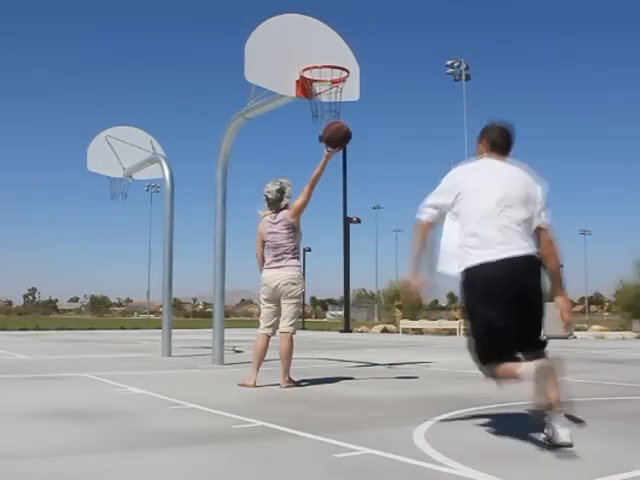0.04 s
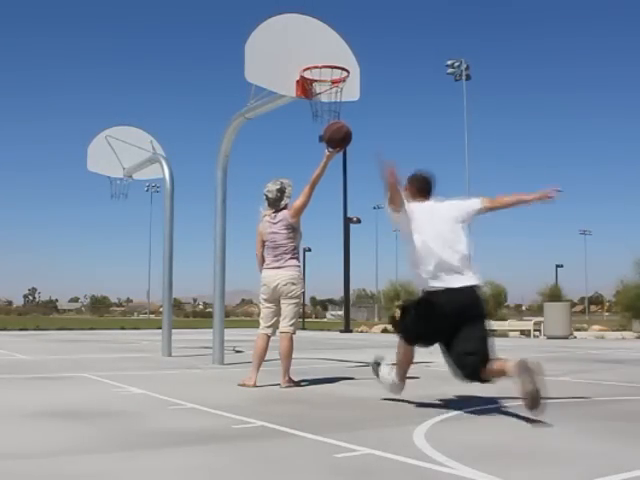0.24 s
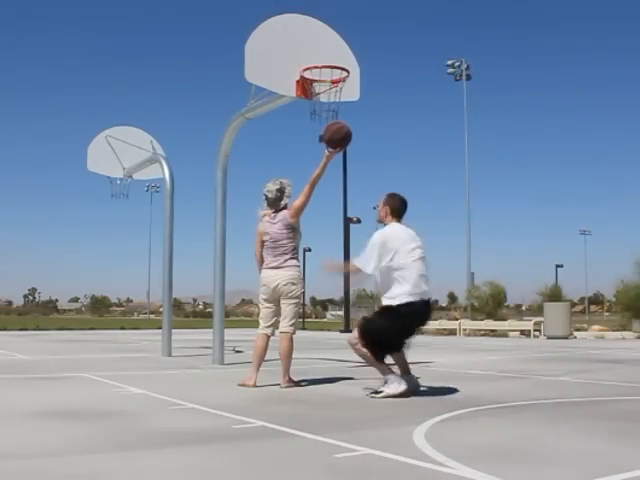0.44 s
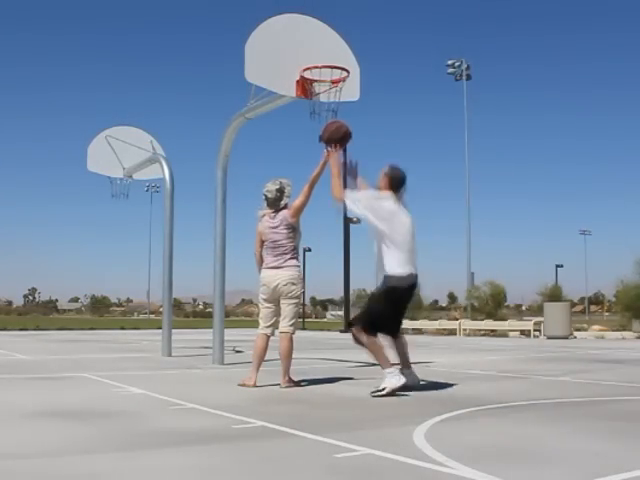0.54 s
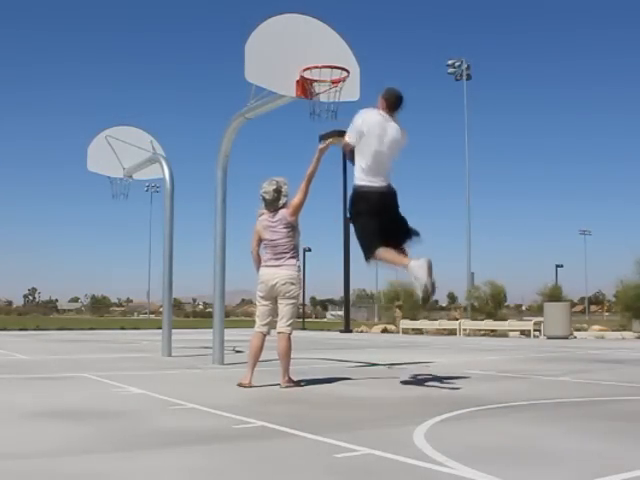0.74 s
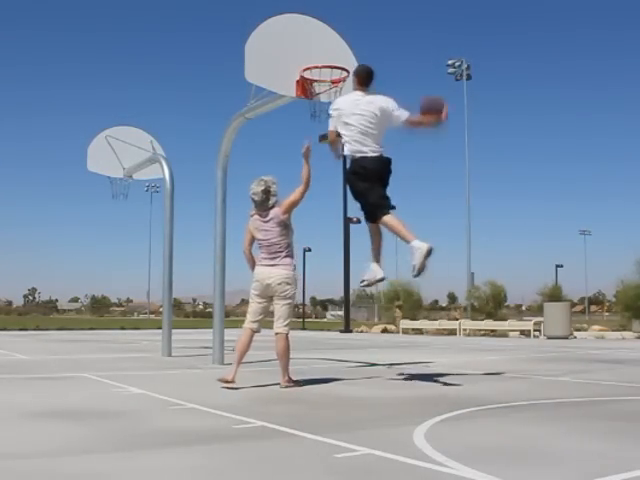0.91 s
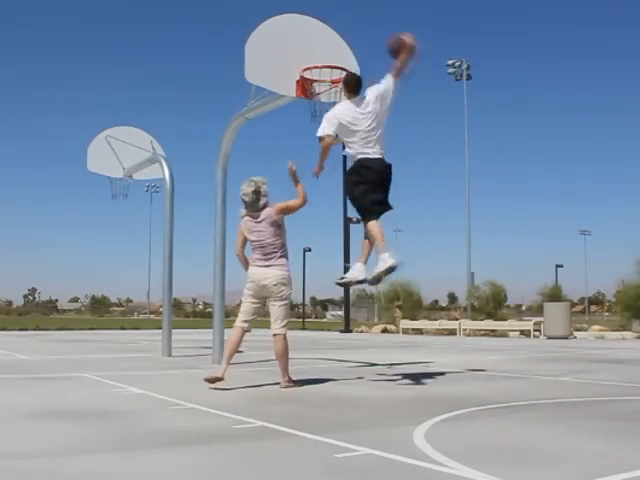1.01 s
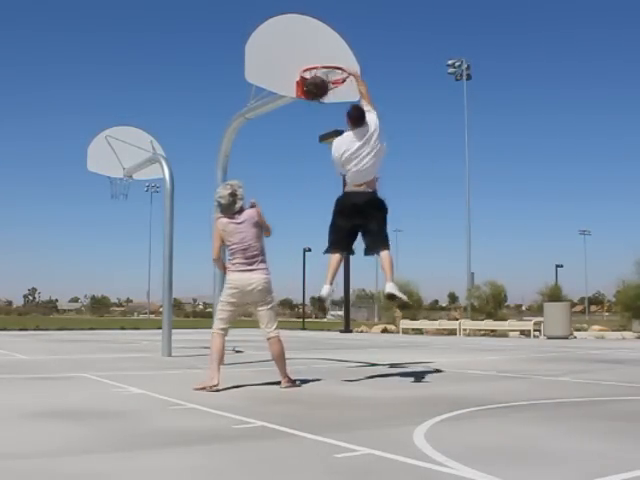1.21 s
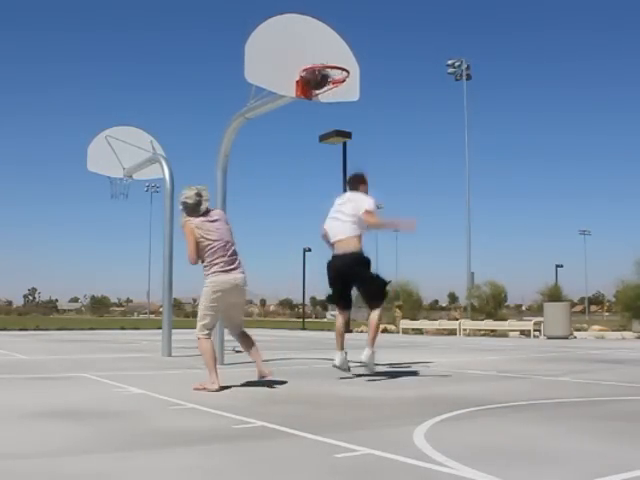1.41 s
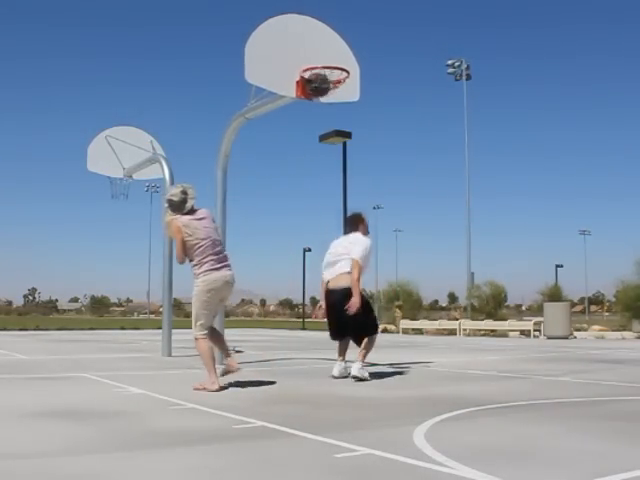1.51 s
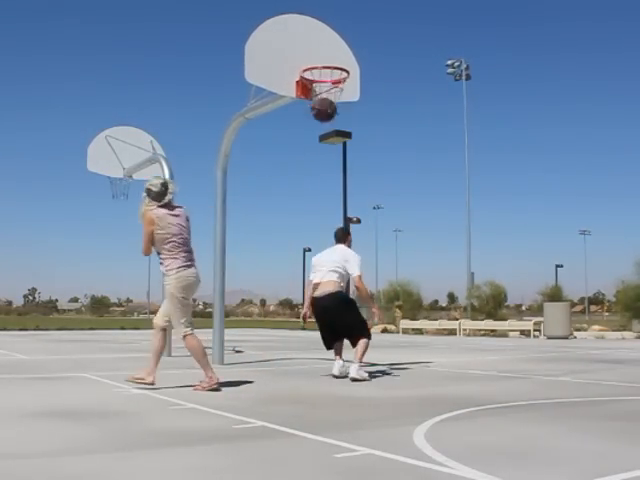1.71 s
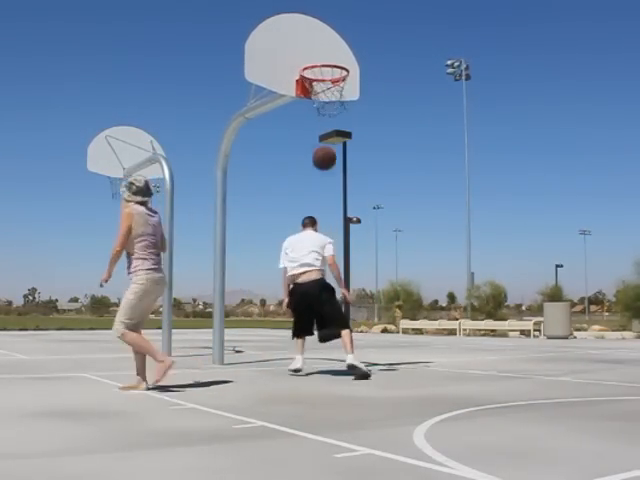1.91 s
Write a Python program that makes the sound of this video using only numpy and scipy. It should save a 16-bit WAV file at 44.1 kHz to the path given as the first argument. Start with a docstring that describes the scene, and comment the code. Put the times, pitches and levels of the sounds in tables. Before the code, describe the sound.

A basketball dunk hits the rim and jangles a chain net, with wind on the microphone.

```python
"""A player runs up on an outdoor concrete court, his shoes tapping, scraping and squeaking.
He slaps a held-up ball and dunks it: the ball knocks the steel rim, the backboard clatters
and the chain net snaps taut. Its links hit each other and jangle on, slowly getting quieter.
All along, gusts buffet the microphone over a faint rush of open air."""
import sys
import numpy as np
from scipy import signal
from scipy.fft import rfft, irfft
from scipy.io import wavfile
from scipy.ndimage import uniform_filter1d, minimum_filter1d

SR = 44100
rng = np.random.default_rng(int(sys.argv[2]) if len(sys.argv) > 2 else 0)


def pcm_store(signal):
    """Save signal as 16-bit PCM."""
    levels = np.round(np.clip(np.atleast_2d(signal), -1, 1) * 32767)
    wavfile.write(sys.argv[1], SR, levels.astype(np.int16).T)


N = 85995
T = np.arange(N) / SR
KNOCK_DECAY_S, CLICK_DECAY_S = 0.0078, 0.0033
DUNK = dict(start_s=1.159, attack_s=0.0064, hold_s=0.036)  # jolts both net and backboard

# The ball's blows on the rim: start_s, level_db (in all tables, levels are relative)
RIM_HITS = [(1.151, -2.5), (1.168, -7.5), (1.184, -1.5), (1.335, -11), (1.56, -19)]
# Ringing notes of rim and backboard: pitch_hz, level_db, ring_s
RIM_NOTES = [(539, -35.5, 0.73), (774.7, -27, 0.78), (1200, -55, 0.92), (1375, -33, 0.55),
             (1445, -35, 0.64), (1620, -32, 0.43), (1750, -29, 0.18), (2220, -37, 0.6), (2360, -37, 0.57),
             (3208, -45, 1.9), (4760, -36, 1.2), (4755, -33, 0.58), (5360, -42, 1), (6107, -34, 0.71)]
# Tone of each knock: frequency_hz, level_db
KNOCK_TONE = [(300, 6.5), (800, 6.5), (1700, 0), (3500, -15.5)]


def rim():
    """Each blow of the ball knocks the steel rim and sets it ringing."""
    out = 0
    for hit in RIM_HITS:
        steel = notes(RIM_NOTES)
        knock = amp(-15) * shape_tone(burst(KNOCK_DECAY_S), KNOCK_TONE)
        out += ring(strikes([hit]), steel + knock)
    return out


# Tone of the chain's crash: frequency_hz, level_db
CRASH_TONE = [(700, 1), (2400, -6.5), (4500, 9), (7000, 1), (14000, -3.5)]


def chain_crash():
    """The ball snaps the net taut, so many links collide almost at once."""
    hits = amp(-14) * collisions(per_s=5000) * envelope(**DUNK, fade_s=0.015)
    return shape_tone(ring(hits, unit_energy(burst(CLICK_DECAY_S))), CRASH_TONE)


# How hard the chain shakes: time_s, level_db
SHAKE = [(1.16, -34.5), (1.21, -21), (1.26, -27.5), (1.31, -27.5), (1.36, -25), (1.45, -31.5),
         (1.51, -27.5), (1.58, -27.5), (1.65, -32.5), (1.74, -35), (1.78, -30), (1.83, -42), (1.95, -38)]
# Groups of notes a link rings at: pitch_hz, spread_hz, level_db, ring_s
LINK_NOTES = [(2280, 203, -11.5, 0.093), (4505, 470, -3, 0.14), (5325, 260, -0.5, 0.085),
              (5960, 250, -0.5, 0.11), (8275, 136, -2, 0.23), (9530, 143, -8.5, .16),
              (10210, 140, -6.5, .17)]
# Tone of link clicking on link: frequency_hz, level_db
CLICK_TONE = [(400, -16), (800, -12), (2000, -7.5), (3000, 0.5), (4700, 2.5), (6000, 0.5), (6700, 4),
              (10000, 0.5), (14000, -4)]


def chain_jangle(strands=12, hits_per_s=1100):
    """Shaken links collide; each strand of the net clicks and rings at its own pitches."""
    shake = curve(SHAKE) * (T > RIM_HITS[0][0] - 0.002)  # still until the ball arrives
    clicks, ringing = 0, 0
    for _ in range(strands):
        hits = collisions(hits_per_s / strands) * shake / np.sqrt(strands)
        link = notes([(hz + spread * rng.uniform(-1, 1), db, ring_s)
                      for hz, spread, db, ring_s in LINK_NOTES * 2])  # two notes per group
        ringing += ring(hits, unit_energy(link))
        clicks += ring(hits, unit_energy(burst(CLICK_DECAY_S)))
    return amp(-2) * shape_tone(clicks, CLICK_TONE) + amp(-0.5) * ringing


# Tone of the backboard's clatter: frequency_hz, level_db
BOARD_TONE = [(350, -14.5), (600, 1.5), (900, -7), (1500, -4.5), (2300, -4.5), (3500, -15.5)]


def backboard():
    """The dunk rattles the board: many small knocks that die away."""
    hits = collisions(per_s=1100) * envelope(**DUNK, fade_s=0.25)
    clatter = ring(hits, unit_energy(burst(KNOCK_DECAY_S)))
    return amp(-24) * shape_tone(clatter, BOARD_TONE)


# Palm and fingers landing on the ball: start_s, smack_db, skin_db
SLAPS = [(0.6787, -15.5, -10), (0.6933, -16.5, -22.5)]
# Tone of the smack: frequency_hz, level_db
SLAP_TONE = [(300, 10.5), (900, 4.5), (1750, 4), (2200, -6), (3300, -6), (3900, -9), (5200, -13),
             (13000, -27)]


def ball_slap(skin_hz=1760, ring_s=0.013):
    """The hand takes the ball with a dry double slap; the tight skin rings briefly."""
    smack = sum(ring(strikes([(s, db)]), burst(decay_s=0.0031)) for s, db, _ in SLAPS)
    skin_hits = strikes([(s, db) for s, _, db in SLAPS])
    skin = ring(skin_hits, notes([(skin_hz, 0, ring_s)]))
    return shape_tone(smack, SLAP_TONE) + skin


# Shoes landing: start_s, level_db
STEPS = [(.041, -28), (.047, -25.5), (.052, -25.5), (.217, -26.5), (.3238, -16), (1.484, -13),
         (1.823, -20.5)]
# Tone of a step: frequency_hz, level_db
STEP_TONE = [(200, -2), (700, -0.5), (1400, 7.5), (2400, -11.5), (4500, -10), (9000, -32), (14000, -30)]


def footsteps():
    """Shoes hit hard concrete with short taps."""
    return shape_tone(ring(strikes(STEPS), burst(decay_s=0.0024)), STEP_TONE)


# Soles gripping: start_s, length_s, level_db
SQUEAKS = [(.172, 0.0081, -37), (.383, 0.015, -33.5)]


def shoe_squeaks(pitch_hz=3760, width_hz=1350):
    """Rubber grips the court with a hoarse squeak, a narrow band of rubbing noise."""
    edges_hz = [pitch_hz - width_hz / 2, pitch_hz + width_hz / 2]
    band = signal.butter(2, edges_hz, "bandpass", fs=SR, output="sos")
    return signal.sosfilt(band, rubbing(SQUEAKS)) * np.sqrt(SR / 2 / width_hz)  # restore lost power


# Soles sliding: start_s, length_s, level_db
SCUFFS = [(0.134, 0.063, -45), (0.211, 0.027, -44), (0.341, 0.031, -31.5), (0.376, 0.021, -34.5),
          (.448, 0.029, -42.5), (0.465, 0.017, -31.5), (0.486, 0.044, -39), (0.619, 0.0036, -36.5),
          (0.635, 0.0027, -39), (0.651, 0.0044, -44)]
# Tone of a scrape: frequency_hz, level_db
SCUFF_TONE = [(600, -9), (1400, -0.5), (2500, -1.5), (4000, -1.5), (5500, -7.5), (9000, -11),
              (14000, -15.5)]


def shoe_scuffs():
    """Soles scrape over grit."""
    return shape_tone(rubbing(SCUFFS), SCUFF_TONE)


# How hard the wind presses on the microphone: time_s, level_db
GUSTS = [(0.0, -38.5), (0.064, -25.5), (0.102, -32.5), (0.28, -14.5), (0.39, -12.5), (0.434, -12),
         (0.476, -27.5), (0.53, -25), (0.58, -52), (0.67, -26.5), (0.732, -35), (0.884, -38), (0.928, -23),
         (1.0, -40.5), (1.045, -27.5), (1.09, -2), (1.15, -23.5), (1.238, -36.5), (1.336, -29.5),
         (1.378, -13), (1.425, -17), (1.535, -15.5), (1.575, -26.5), (1.6, -16.5), (1.666, -17.5),
         (1.76, -33), (1.83, -54), (1.95, -37)]
# Tone of the wind: frequency_hz, level_db
WIND_TONE = [(15, -17), (25, -20), (86, -1), (142, -1), (252, -5.5), (331, -10), (662, -21), (850, -25),
             (1270, -40), (2500, -51), (3250, -59), (5500, -120)]


def wind(top_hz=2000, split_hz=430):
    """Big swirls of air rumble with each gust; small ones sputter on top."""
    gust = curve(GUSTS)
    flow = shape_tone(noise(), WIND_TONE)
    flow = signal.sosfilt(signal.butter(2, top_hz, fs=SR, output="sos"), flow)
    flow /= np.sqrt(uniform_filter1d(flow ** 2, size=1500))  # even out the level
    big = signal.sosfiltfilt(signal.butter(2, split_hz, fs=SR, output="sos"), flow)
    growth = (gust / gust.max()) ** 0.16  # small swirls grow faster than the gust
    small = (flow - big) * flicker(spread_db=6, per_s=110) * growth
    return amp(1.5) * gust * (big + small)


# Single swirls hitting the microphone: peak_s, level_db, pitch_hz
THUMPS = [(0.283, -5.5, 130), (0.331, -2, 117), (.338, 1.5, 294), (.405, -2.5, 433), (0.696, -11.5, 157),
          (0.811, -15.5, 146), (1.069, -6, 185), (1.089, -6.5, 167), (1.0992, 1, 510), (1.128, -5, 370),
          (1.441, -7, 335), (1.470, 0, 203), (1.482, -5.5, 376), (1.523, -4, 352), (1.671, -1.5, 192),
          (1.929, -17, 187)]
# Tone of the crack that comes with one thump: frequency_hz, level_db
CRACK_TONE = [(400, 0), (900, 5), (1600, -15), (5000, -51)]


def wind_thumps(width_cycles=0.44, crack_s=1.098, crack_db=-6.5):
    """Some swirls hit the microphone as single thumps, one of them with a crack."""
    thumps = 0
    for peak_s, db, hz in THUMPS:
        cycles = (T - peak_s) * hz
        swell = np.exp(-0.5 * (cycles / width_cycles) ** 2)
        thumps += amp(db) * swell * np.cos(2 * np.pi * (cycles + rng.random()))
    crack = ring(strikes([(crack_s, crack_db)]), burst(decay_s=0.0058))
    return thumps + shape_tone(crack, CRACK_TONE)


# Tone of the open air: frequency_hz, level_db
AIR_TONE = [(35, -19), (60, 1.5), (119, -3.5), (332, -12.5), (447, -8.5), (1570, -16.5), (2110, -21),
            (12800, -43.5), (14000, -38)]


def open_air():
    """A faint, steady outdoor rush."""
    return amp(-38.5) * unit_level(shape_tone(noise(), AIR_TONE))


def amp(db):
    """Turn decibels into a multiplier."""
    return 10 ** (np.asarray(db) / 20)


def unit_level(x):
    """Scale to an average (rms) level of 1."""
    return x / np.sqrt(np.mean(x ** 2))


def unit_energy(x):
    """Scale to a total energy of 1."""
    return x / np.linalg.norm(x)


def noise():
    """Plain white hiss."""
    return rng.standard_normal(N)


def curve(rows):
    """Loudness that glides through (time_s, level_db) points."""
    return amp(np.interp(T, *np.array(rows).T))


def shape_tone(x, points):
    """Filter through (frequency_hz, level_db) points, keeping the power of white hiss."""
    hz, db = np.array(points).T
    grid_hz = np.arange(N + 1) * SR / (2 * N)
    gain = unit_level(amp(np.interp(np.log(grid_hz + 1), np.log(hz), db)))
    # build the filter so that nothing sounds ahead of a hit
    cepstrum = irfft(np.log(gain))[:N] * np.r_[1, np.full(N - 1, 2)]
    return irfft(rfft(x, 2 * N) * np.exp(rfft(cepstrum, 2 * N)))[:N]


def flicker(spread_db, per_s):
    """Loudness that wanders smoothly at random."""
    step = max(int(SR / per_s), 1)
    jumps = np.repeat(rng.standard_normal(N // step + 1), step)
    drift = unit_level(uniform_filter1d(jumps, step)[:N])
    return unit_level(amp(spread_db * drift))


def envelope(start_s, attack_s, hold_s, fade_s):
    """Loudness that rises, holds, then dies away."""
    rise = np.clip((T - start_s) / attack_s, 0, 1)
    return rise * np.exp(-np.maximum(T - start_s - hold_s, 0) / fade_s)


def strikes(rows):
    """One spike for each (start_s, level_db) row."""
    out = np.zeros(N)
    for start_s, db in rows:
        out[int(start_s * SR)] += amp(db)
    return out


def ring(hits, response):
    """Let every hit set off a copy of the response."""
    return signal.fftconvolve(hits, response)[:N]


def notes(rows):
    """Pure tones added together, each fading by 60 dB in its ring_s."""
    return sum(amp(db) * np.sin(2 * np.pi * (hz * T + rng.random())) * np.exp(-np.log(1000) * T / ring_s)
               for hz, db, ring_s in rows)


def burst(decay_s):
    """A dying puff of hiss."""
    return noise() * np.exp(-T / decay_s)


def collisions(per_s, spread_db=3.5):
    """Spikes of uneven strength at random times."""
    spikes = (rng.random(N) < per_s / SR) * np.sign(noise())
    return unit_level(spikes * amp(spread_db * np.clip(noise(), -2, 2)))


def rubbing(rows):
    """Gritty hiss for each (start_s, length_s, level_db) row."""
    pressure = sum(amp(db) * envelope(start_s, attack_s=0.0032, hold_s=length_s, fade_s=0.0042)
                   for start_s, length_s, db in rows)
    return pressure * noise() * flicker(spread_db=2.5, per_s=900)


def scene():
    """The run-up and dunk with a faint echo off the court, plus open air and wind."""
    play = footsteps() + shoe_squeaks() + shoe_scuffs() + ball_slap()
    play += rim() + backboard() + chain_crash() + chain_jangle()
    echo = amp(-26.5) * ring(play, unit_energy(burst(decay_s=0.022)))
    return (play + echo + open_air() + wind() + wind_thumps())[None]


def record(dry):
    """A limiter briefly turns everything down at the loudest peaks; the highest treble is then cut."""
    limit, recover_s, top_hz = 0.99, 0.071, 13900
    fall = T / recover_s
    log_level = np.log(np.maximum(np.abs(dry), limit))
    peak = np.exp(np.maximum.accumulate(log_level + fall, axis=-1) - fall)  # jumps up, sinks slowly
    gain = minimum_filter1d(limit / peak, size=200)
    smooth_gain = uniform_filter1d(uniform_filter1d(gain, size=100), size=100)
    return signal.sosfilt(signal.ellip(10, 0.2, 70, top_hz, fs=SR, output="sos"), dry * smooth_gain)


dry = scene()
out = record(dry)
pcm_store(out)
```